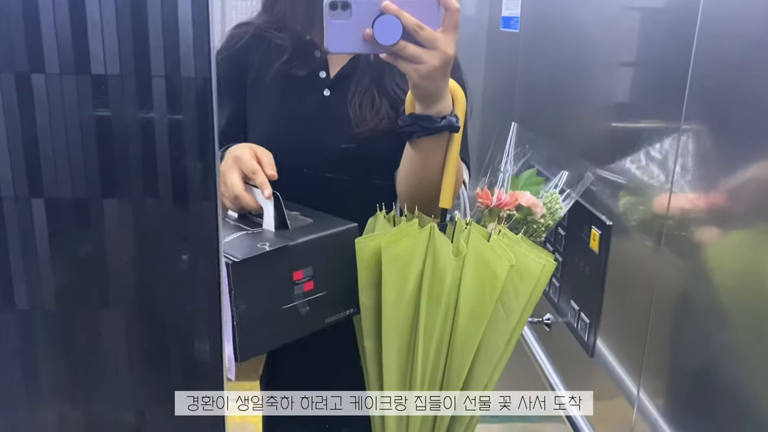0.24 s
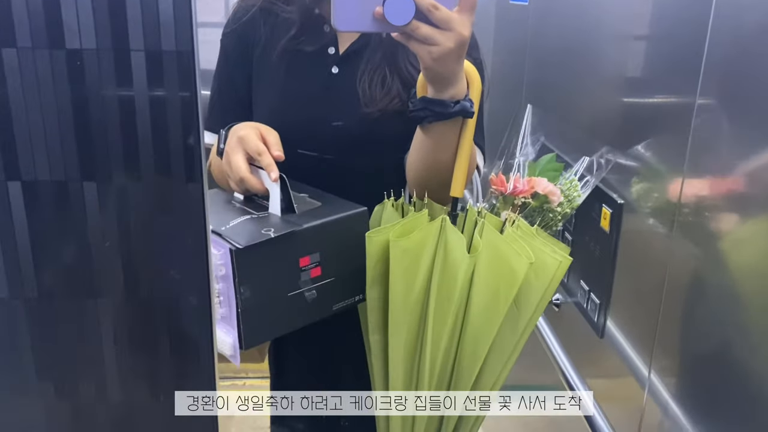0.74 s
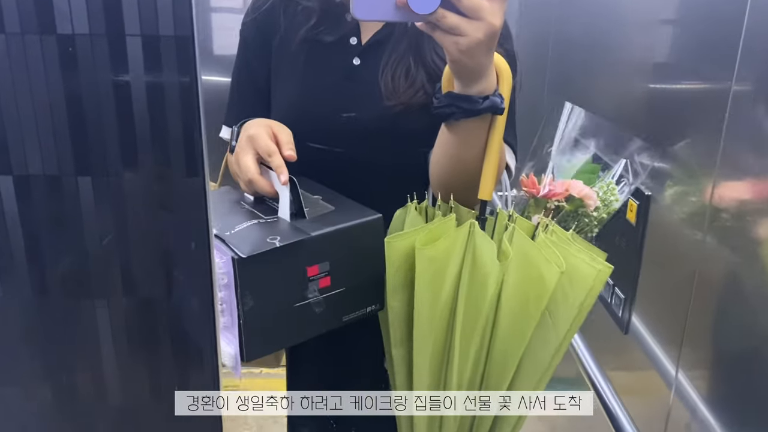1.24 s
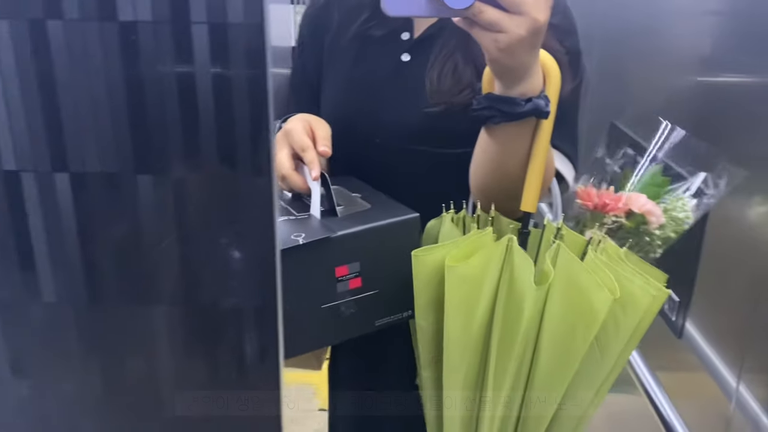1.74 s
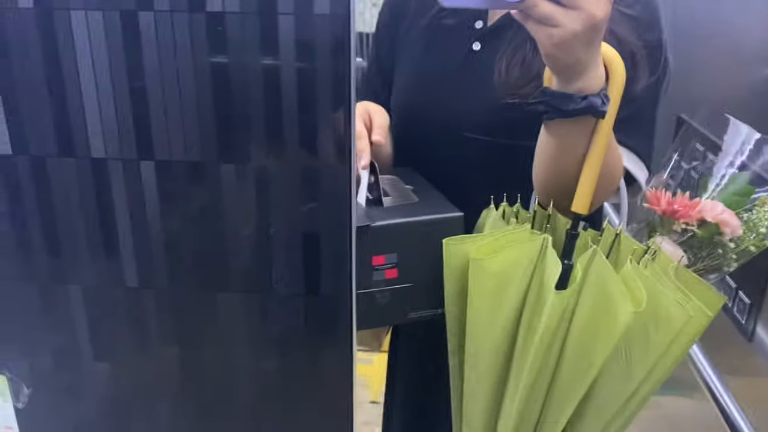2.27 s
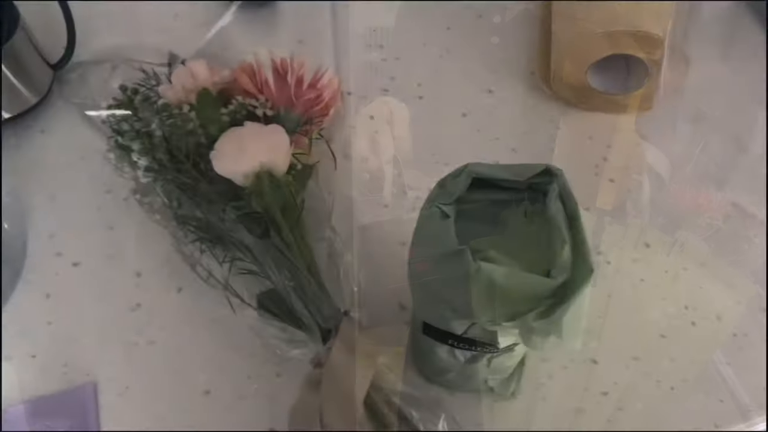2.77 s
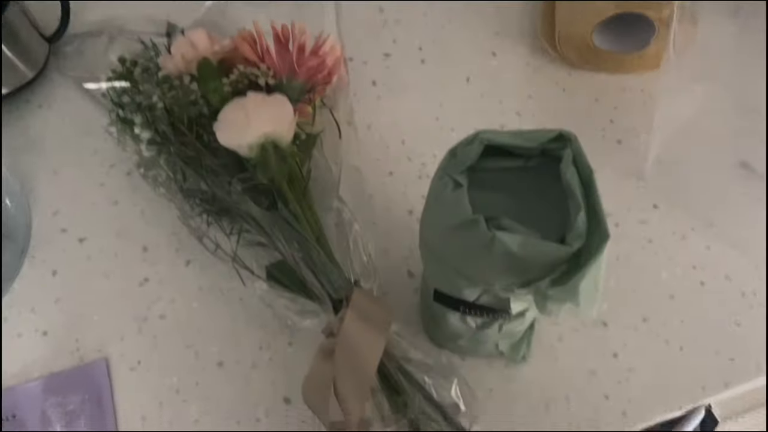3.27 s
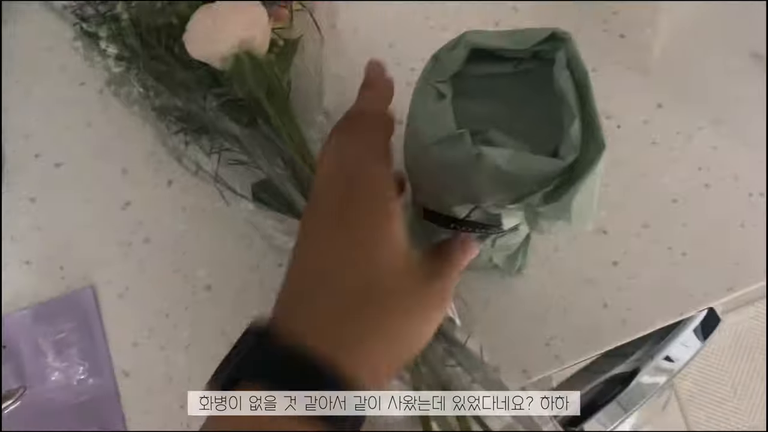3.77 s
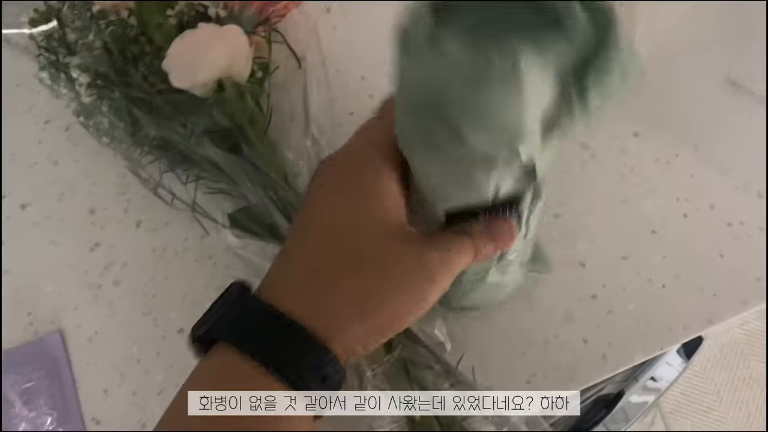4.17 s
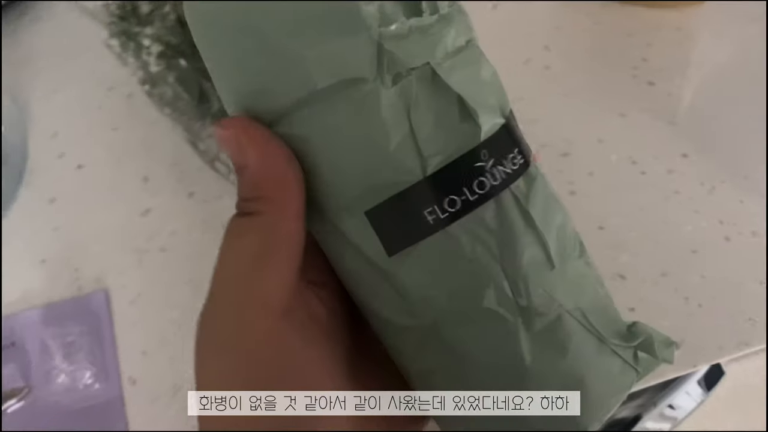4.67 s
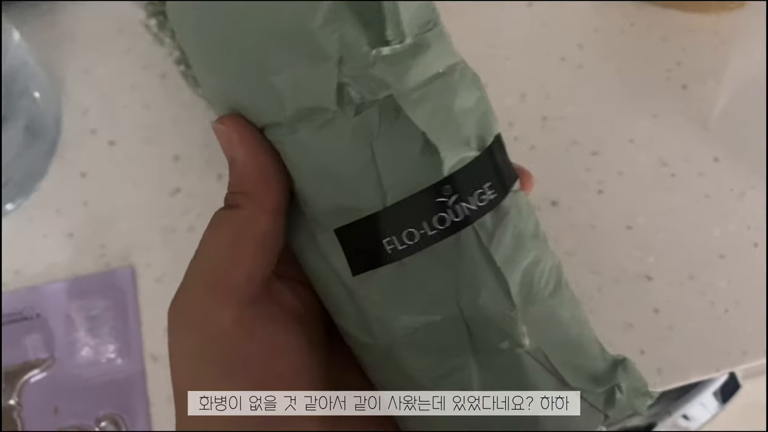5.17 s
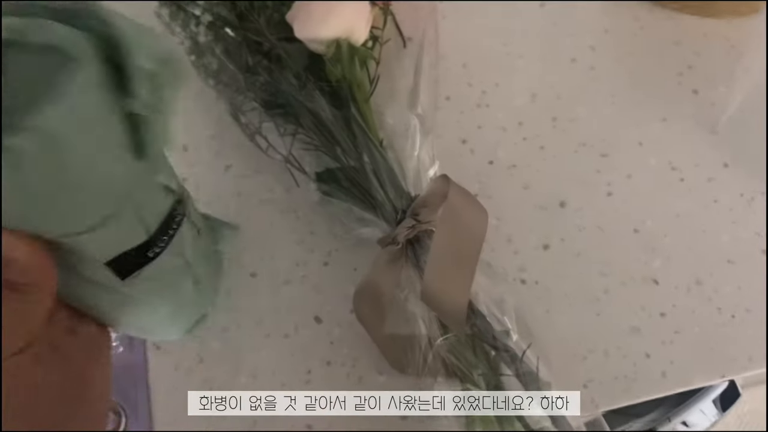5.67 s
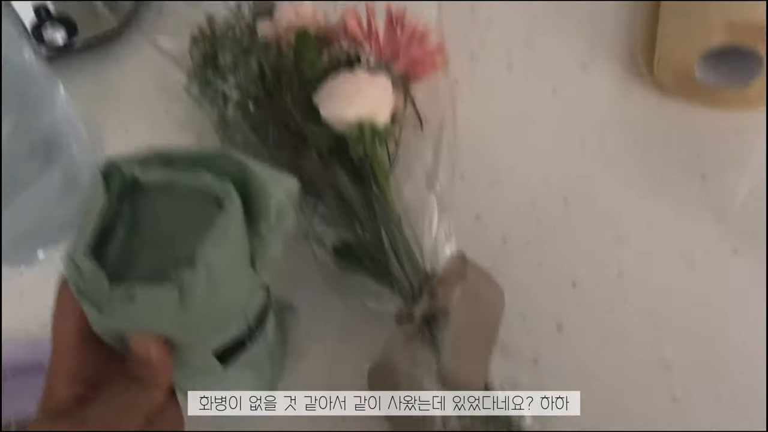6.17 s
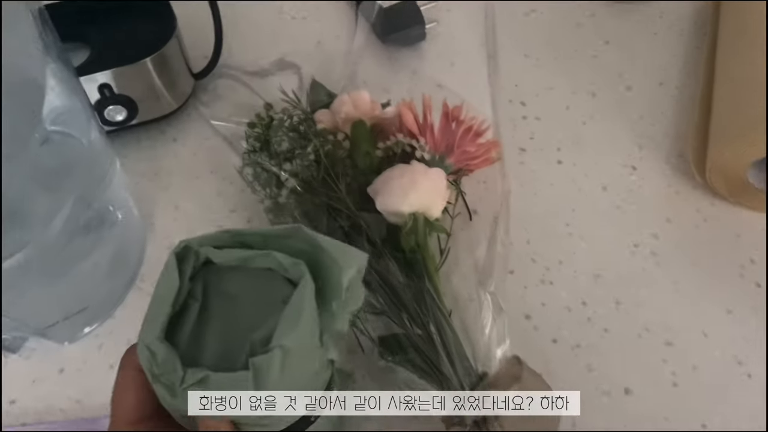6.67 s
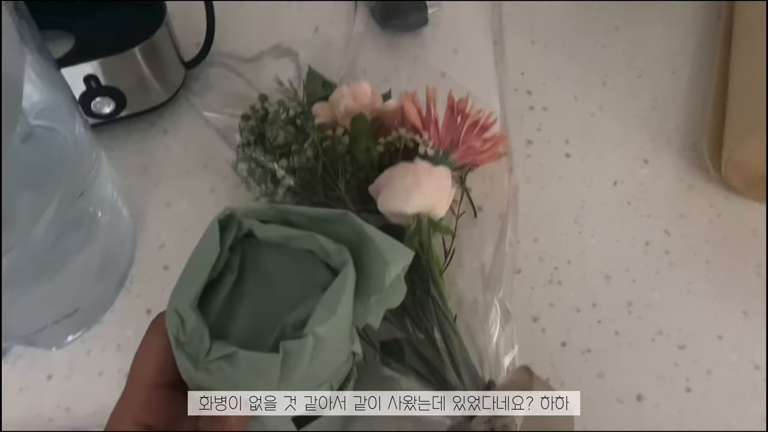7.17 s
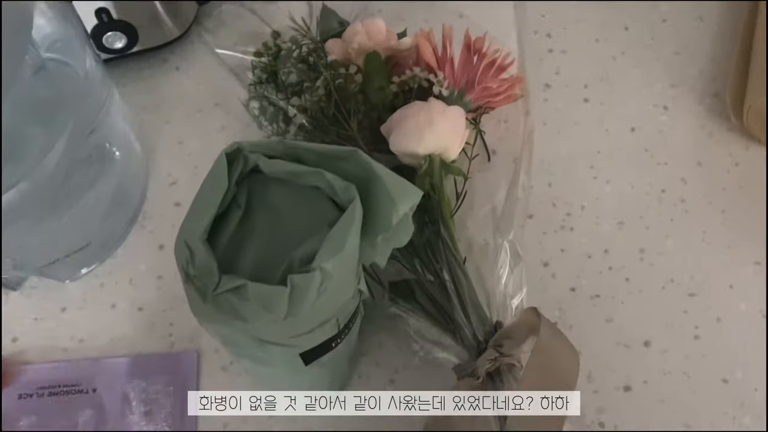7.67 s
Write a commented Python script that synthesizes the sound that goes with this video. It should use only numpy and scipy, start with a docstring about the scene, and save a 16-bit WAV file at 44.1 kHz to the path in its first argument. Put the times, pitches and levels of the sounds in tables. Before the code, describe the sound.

An elevator car rumbles steadily, with faint fan hiss and a thin motor whine, while a bouquet's plastic wrapping rustles lightly. The ride cuts abruptly to a quiet kitchen with a faint fridge hum. A hand grabs a paper-wrapped vase with sharp crackles and a dull thud, turns it with more crinkling, then sets it on the counter, where it rocks with soft knocks. A phone microphone hears it all close by.

```python
"""You hear a moving lift boom, hiss and whine while a bouquet's wrapping rustles, then a quiet kitchen.
The lift's motor shakes the cabin, a fan adds hiss, and the wrapping film brushes against a sleeve.
In the kitchen a fridge hums as a hand picks up a paper-wrapped vase and turns it, snapping creases
in the stiff paper. Set down on the stone counter, the vase rocks, and each knock makes it ring.
Everything is heard through a phone's two microphones."""
import sys
import numpy as np
from scipy import signal
from scipy.fft import rfft, irfft, next_fast_len
from scipy.io import wavfile
from scipy.ndimage import uniform_filter1d

SR = 44100
rng = np.random.default_rng(int(sys.argv[2]) if len(sys.argv) > 2 else 0)


def write(x):
    x = np.atleast_2d(x).T
    wavfile.write(sys.argv[1], SR, np.round(np.clip(x, -1, 1) * 32767).astype(np.int16))


N = 348831
T = np.arange(N) / SR
FFT_SIZE = next_fast_len(N + 4096)
FREQS = np.maximum(np.arange(FFT_SIZE // 2 + 1) * SR / FFT_SIZE, 1)
KITCHEN_START_S = 2.857

# Paper creases that snap. Each row: start in seconds, level in dB, dB added to the low part,
# dB added to the high part, ringing pitch in Hz.
SNAPS = [(3.4135, -67, 4, -12, 1540), (3.4255, -58.5, 2.5, -1, 1940), (3.728, -66, -11.5, 14, 4720),
         (3.7776, -25.5, -16, 2, 5200), (3.7946, -26.5, -2, 2, 4670), (3.7966, -28, 1, 1, 2240),
         (3.797, -29, -7.5, 0, 2520), (3.8009, -30.5, 1.5, 1, 5070), (3.8588, -43, -4, -1, 2100),
         (3.95, -59, -24, -19, 5120), (3.9677, -40.5, -7, 5.5, 2100), (4.0781, -39.5, -8, 1, 2330),
         (4.111, -48, -18.5, 5, 5200), (4.2007, -29, -3.5, 4.5, 4840), (4.2004, -30.5, -22.5, -6, 1510),
         (4.2201, -42.5, 5, -21, 1380), (4.2686, -56, -7, -8, 1790), (4.337, -44, -6, -17, 2300),
         (4.3885, -38, -22, -21, 5130), (4.415, -39.5, -6, -20, 2350), (4.4972, -40.5, -29, 4, 2180),
         (4.528, -39, -16, -8, 4860), (4.575, -33, -6.5, -6.5, 2240), (4.6447, -40.5, -3, -2, 2240),
         (4.675, -41, -5, -17, 2310), (4.7036, -43.5, -1, -5, 2100), (4.7362, -49, -4, -3, 4940),
         (4.762, -45.5, -8, 5.5, 2390), (4.784, -43, -22, -11, 5070), (4.805, -37, -17, -4, 5470),
         (4.8447, -42.5, -26, 2, 1970), (4.916, -49.5, -14, -3, 2300), (4.9552, -50, -13, -22, 2300),
         (4.976, -45.5, -14, -5, 1940), (4.986, -42, -9, -8, 2010), (5.0012, -42.5, -29, 3, 4830),
         (5.025, -49, -29, -1, 4980), (5.047, -45.5, -25, -2, 5190), (5.0604, -49, -31, -2, 4460),
         (5.0674, -49, -31, -8, 4910), (5.133, -50.5, -24, 8, 2290), (5.1427, -49, -29, 10, 4580),
         (5.1866, -47, -24, -17, 2340), (5.2055, -47, -22, 2.5, 4700), (5.2254, -55, -20, -14, 2300),
         (5.253, -47, -22, -6, 2160), (5.2718, -38.5, -24, -1, 2550), (5.294, -40.5, -14, -24, 2370),
         (5.299, -39, -12, -17, 2320), (5.308, -43, -23, -18, 2400), (5.3912, -45, -29, -20, 5100),
         (5.452, -48, -20, -15, 5070), (5.475, -44, -24, -15, 2090), (5.526, -53, -18, 6, 4840),
         (5.577, -49, -16, -5, 4900), (5.622, -52.5, -24, 5, 3320), (5.7095, -49, -20, -5, 4760),
         (5.764, -52.5, -22, 0, 1880), (5.902, -46, -25, -3, 4600), (5.9664, -50, -19, -5, 4740),
         (6.013, -48.5, -22, 1, 5300), (6.0646, -37.5, -16, -12, 5140), (6.08, -43, -17, -20, 5160),
         (6.1679, -46, -2.5, -22, 1610), (6.196, -52, 3, -15, 4860), (6.2884, -53, -25, 0, 5260),
         (6.336, -51, -24, 4, 4620), (6.418, -56, -26, -12, 4720), (6.5063, -57, -15, 3, 2270),
         (6.5342, -57, -11, 3, 2100), (6.6743, -48.5, -27, -24, 4700), (7.0389, -52, -4, -6, 4470),
         (7.062, -58.5, -4, -1, 5310), (7.095, -53, -23, -6, 3100), (7.104, -52.5, -18, -4, 5470),
         (7.2028, -53.5, -10, 4, 3630), (7.2326, -59, -2, 14, 5540), (7.3274, -47, -15, -24, 5240),
         (7.428, -58.5, -23, -23, 4900), (7.5216, -61.5, -6.5, -17, 3230), (7.539, -65.5, -26, 5, 4940),
         (7.637, -58, -27, -1.5, 5820), (7.892, -52.5, -38, -40.5, 5370)]


def undb(db):
    """Turn decibels into a gain; undb(2 * db) gives power."""
    return 10 ** (np.asarray(db) / 20)


def unit(x):
    """Scale a signal to an average power of 1."""
    return x / np.sqrt(np.mean(x ** 2))


def over_time(rows, column=1):
    """Join a table's points with straight lines in time."""
    rows = np.array(rows)
    return np.interp(T, rows[:, 0], rows[:, column])


def over_hz(rows):
    """Join a table's points across frequency, giving each octave equal room."""
    rows = np.array(rows)
    return np.interp(np.log(FREQS), np.log(rows[:, 0]), rows[:, 1])


def filtered(x, gain):
    """Give each frequency its own gain."""
    return irfft(rfft(x, FFT_SIZE) * gain, FFT_SIZE)[..., :N]


def wander(rate):
    """Glide to a new random value `rate` times a second; typical size 1."""
    hold = int(SR / rate)
    steps = np.repeat(rng.standard_normal(N // hold + 1), hold)
    return unit(uniform_filter1d(steps, hold // 2)[:N])


def clicks(rate, spread_db):
    """Powers of about `rate` random clicks a second, many small and few large."""
    hit = rng.random(N) < rate / SR
    power = hit * undb(2 * spread_db * np.minimum(rng.exponential(size=N), 3))
    return power / power.mean()


def bursts(power, snap_s, echo_s, echo_db, rise_s):
    """Turn clicks into noise bursts with a room echo; return two channels and one burst's energy."""
    t = T[:SR // 4]
    echo = undb(2 * echo_db) * np.exp(-2 * np.log(1000) * t / echo_s)
    burst = (1 - np.exp(-(t / rise_s) ** 2)) * (np.exp(-t / snap_s) + echo)
    noise_power = np.abs(signal.fftconvolve(power, burst)[:N])
    return np.sqrt(noise_power) * rng.standard_normal((2, N)), burst.sum()


def swells(base_db, starts, peaks_db, hold_s, rise_db_s, fall_db_s):
    """A level in dB: a base plus events that rise, hold and fall at set dB per second."""
    power = undb(2 * base_db)
    for start, peak_db, hold in np.broadcast(starts, peaks_db, hold_s):
        near = slice(max(int(start * SR) - SR // 4, 0), int(start * SR) + SR // 2)
        t = T[near] - start
        db = peak_db - rise_db_s * np.maximum(-t, 0) - fall_db_s * np.maximum(t - hold, 0)
        power[near] += undb(2 * db)
    return 10 * np.log10(power)


def microphones(pair, likeness, right_lead_s, in_step_hz, above_hz):
    """Left hears the first signal; right blends it, its treble shifted in time, with the second."""
    left, other = pair
    share = np.clip(over_hz(likeness), 0, 1)
    shift = np.where(FREQS > above_hz, np.exp(2j * np.pi * right_lead_s * (FREQS - in_step_hz)), 1)
    right = filtered(left, share * shift) + filtered(other, np.sqrt(1 - share ** 2))
    return np.array([left, right])


def kitchen_air():
    """Dull room noise with one ringing band, coming up in two steps."""
    # The room's tone. Each row: frequency in Hz, relative level in dB.
    tone = [(20, -35), (40, -9), (62, 1.5), (95, -9), (135, -22), (200, -14.5), (270, -19.5), (400, -23.5),
            (445, -17), (490, -27), (560, -28.5), (700, -41), (1000, -42), (2000, -46.5), (3000, -51),
            (7500, -53.5), (14000, -62.5)]
    # Its loudness. Each row: time in seconds, level in dB.
    levels = [(2.86, -68.5), (3.7, -65.5), (3.85, -61), (7.91, -63.5)]
    return unit(filtered(rng.standard_normal((2, N)), undb(over_hz(tone)))) * undb(over_time(levels))


def fridge():
    """Mains electricity makes the fridge hum; the level wavers slightly."""
    # The hum. Each row: time in seconds, level in dB.
    levels = [(2.86, -73), (3.7, -77), (3.9, -69), (6.5, -67.5), (7.3, -67), (7.91, -67.5)]
    hum_hz, waver_db = 120.3, 1.4
    db = over_time(levels) + waver_db * wander(rate=9)
    return undb(db) * np.sqrt(2) * np.sin(2 * np.pi * hum_hz * T)


def cabin_rumble():
    """Deep rumble and faint fan hiss, stronger where the motor makes the cabin and its panels ring."""
    # The noise's tone. Each row: frequency in Hz, relative level in dB.
    tone = [(22, -4), (45, -7.5), (80, 1), (150, -2), (220, -8.5), (320, -11), (600, -15), (1000, -19.5),
            (1500, -27), (2600, -31), (4000, -49.5), (7000, -44), (11000, -47), (15000, -46)]
    # Where the cabin rings. Each row: pitch in Hz, width in Hz, boost in dB.
    resonances = [(52, 4, 6.5), (77.3, 7, 4.5), (101.2, 12, 8), (149.4, 11, 3), (178.5, 4.9, 6),
                  (228.7, 5.7, 9), (253.7, 6.2, 11.5), (272.7, 6.7, 4), (382, 16.4, 6.5), (391, 11, 5),
                  (449, 21, 3), (520, 47, 4), (599, 8.1, 6), (828.3, 7.7, 6), (986, 45, 3.5)]
    # The ride's loudness. Each row: time in seconds, level in dB.
    levels = [(0.0, -35.5), (1.0, -35), (1.9, -35.5), (2.15, -36), (2.4, -35.5), (2.85, -36.5)]
    boost = 1 + sum(undb(2 * db) / (1 + (2 * (FREQS - hz) / width) ** 4) for hz, width, db in resonances)
    rumble = filtered(rng.standard_normal((2, N)), undb(over_hz(tone)) * np.sqrt(boost))
    return unit(rumble) * undb(over_time(levels))


def motor_whine():
    """Thin motor tones that waver in pitch and level, loudest overall at full speed."""
    # The tones. Each row: pitch in Hz, then level in dB at the start, at full speed and when slowing.
    whines = [(104.5, -45, -43, -47), (501, -57, -57, -63), (2704, -75, -69, -80), (3974, -82, -82, -82),
              (7955, -84, -84, -84), (11935, -87, -87, -87), (15005, -77, -79, -76)]
    ride_s = (.3, .9, 1.5, 2.0)  # speeds up between the first two, slows between the last two
    waver_hz, waver_db = 2.16, 1.85
    out = 0
    for hz, start_db, full_db, slow_db in whines:
        db = np.interp(T, ride_s, (start_db, full_db, full_db, slow_db)) + waver_db * wander(rate=5.98)
        pitch = hz + waver_hz * wander(rate=7.89)
        out = out + undb(db) * np.sqrt(2) * np.sin(2 * np.pi * np.cumsum(pitch) / SR)
    return out


def bouquet():
    """Wrapping film brushes a sleeve, making tiny clicks that blur into a rustle."""
    # The film's tone. Each row: frequency in Hz, relative level in dB.
    tone = [(600, 3), (1500, 4.5), (2600, 5), (5000, 2), (8000, -3), (15000, -11.5)]
    # Steady brushing. Each row: time in seconds, level in dB.
    steady = [(0.0, -59), (0.9, -58), (1.2, -53.5), (1.5, -54), (1.8, -58), (2.33, -60), (2.85, -56)]
    # Sudden brushes. Each row: time in seconds, peak level in dB.
    brushes = [(0.046, -50.5), (0.23, -53), (0.575, -53), (1.06, -58), (1.11, -57), (1.178, -54),
               (1.248, -48.5), (1.429, -53.5), (1.545, -53)]
    rustle, _ = bursts(clicks(rate=900, spread_db=1.0), snap_s=.002, echo_s=0.3, echo_db=-12, rise_s=.0002)
    db = swells(over_time(steady), *np.transpose(brushes), hold_s=0, rise_db_s=1999, fall_db_s=128)
    return unit(filtered(rustle, undb(over_hz(tone)))) * undb(db)


def paper_crackle():
    """Stiff paper creases under the hand: a fine rustle and single snaps, in low, middle and high parts."""
    # The paper's tone. Each row: frequency in Hz, relative level in dB.
    tone = [(150, -22), (300, -11), (600, -7.5), (1000, -8.5), (1600, -3.5), (1950, -1), (2250, 2),
            (2600, -1), (3100, -3.5), (4000, -4), (5100, 0), (6000, -2.5), (7500, -4.5), (10000, -11),
            (14000, -14), (16000, -17)]
    # Steady rustle under the hand. Each row: time in seconds, level in dB, dB added to the low part.
    grip = [(3.7, -107, -8), (3.74, -61, -6), (3.9, -64.5, -1.5), (4.2, -63, -7), (4.3, -56.5, -5.5),
            (4.65, -55.5, -8.5), (4.74, -65.5, -4), (4.94, -76, -8), (5.18, -70, -4.5), (5.35, -60.5, -6.5),
            (5.5, -62.5, -5), (5.65, -67, -13), (5.88, -75.5, -6.5), (6.15, -67, -9.5), (6.6, -68.5, -11),
            (6.75, -72.5, -13), (6.93, -85, -4), (7.0, -81, -7), (7.35, -71, -9.5), (7.5, -97.5, 8),
            (7.6, -102, 4)]
    # Fingers squeeze the paper. Each row: time in seconds, peak level in dB, hold in seconds.
    squeezes = [(3.774, -54.5, .01), (3.793, -40.5, 0.0072), (3.847, -53, 0.032), (3.997, -57.5, 0.0085),
                (4.117, -56.5, 0.015), (4.2, -69, 0.011), (4.782, -63.5, 0.081), (4.994, -61, 0.0045),
                (5.07, -67.5, .01), (5.133, -69, 0.0086), (5.212, -63.5, .005), (5.29, -59.5, 0.017),
                (5.44, -59.5, 0.027), (5.554, -59.5, 0.0068), (5.69, -69, 0.011), (5.78, -75, 0.0089),
                (5.847, -74, 0.004), (5.919, -66, 0.0035), (6.058, -60, 0.015), (6.198, -62.5, 0.019),
                (6.302, -61, 0.044), (6.513, -65, 0.065), (6.81, -71, 0.089), (6.979, -69.5, .005),
                (7.192, -65, 0.062), (7.3, -68.5, 0.048)]
    low_hz, high_hz = 1855, 7840
    grip_high_db, flicker_db, crack_db = -4, 0.7, -2
    low = 1 / (1 + (FREQS / low_hz) ** 6)
    high = 1 / (1 + (high_hz / FREQS) ** 6)
    starts, snap_db, low_db, high_db, _ = np.transpose(SNAPS)
    parts = [(low, over_time(grip, column=2), low_db), (1 - low - high, 0, 0), (high, grip_high_db, high_db)]
    held = (T > grip[0][0]) & (T < grip[-1][0])
    hand_db = swells(over_time(grip), *np.transpose(squeezes), rise_db_s=397.5, fall_db_s=256)
    shared_creases = clicks(rate=160, spread_db=2.0)  # these sound in all three parts
    out = 0
    for band, rustle_extra_db, snap_extra_db in parts:
        creases = (shared_creases + clicks(rate=1100, spread_db=1.5)) / 2 * held
        creases *= undb(2 * (hand_db + rustle_extra_db + flicker_db * wander(rate=22)))
        rustle, energy = bursts(creases, snap_s=0.0012, echo_s=0.066, echo_db=-9.5, rise_s=0.00019)
        cracks = np.zeros(N)  # the sharp first instant of each snap
        cracks[(starts * SR).astype(int)] = undb(snap_db + snap_extra_db)
        snaps, _ = bursts(cracks ** 2, snap_s=0.00036, echo_s=0.08, echo_db=-16.5, rise_s=0.00025)
        crackle = rustle / np.sqrt(energy) + snaps + undb(crack_db) * cracks
        out = out + filtered(crackle, unit(band * undb(over_hz(tone))))
    return out


def paper_pops(ring_db, cycles):
    """Each snap frees a small patch of paper, which rings briefly at its own pitch."""
    out, t = np.zeros(N + SR), T[:SR // 50]
    for start, db, _, _, hz in SNAPS:
        ring = np.exp(-t * hz / cycles) * np.sin(2 * np.pi * hz * t)
        out[int(start * SR):][:len(t)] += undb(db + ring_db) * ring
    return out[:N]


def vase_knocks():
    """Paper softens the start of each knock, then the vase rings; a tight grip shortens both."""
    # Dull thuds as the hand grabs and turns the vase, then rocking on the counter. Each row: start in
    # seconds, level in dB, pitch in Hz (set by the spot hit), time stretch (smaller for a tighter grip).
    knocks = [(3.427, -56, 620, 0.4), (3.428, -62, 320, 0.5), (3.8, -43, 500, 0.8),
              (3.795, -28.5, 666, 0.16), (3.780, -46, 258, 0.4), (3.797, -46, 245, 1.3),
              (3.799, -46.5, 824, 0.8), (3.84, -51, 245, 0.8), (4.202, -51, 650, 0),
              (4.322, -57.5, 490, 0.6), (4.435, -64, 536, 0.7), (4.528, -57, 520, 1), (4.575, -74, 490, .8),
              (4.629, -59, 453, .8), (4.678, -61.5, 525, 0.9), (4.737, -57, 479, 0.36),
              (4.99, -70, 520, .8), (5.476, -61.5, 520, 1), (6.169, -45, 350, 0.6),
              (6.170, -48.5, 500, 0.64), (6.209, -47, 444, 0.96), (6.234, -45, 435, 0.8),
              (6.254, -54, 462, 1), (6.278, -53, 436, 0.9), (6.361, -60, 454, 0.85), (6.451, -63, 442, .95),
              (6.577, -56, 438, 1), (6.602, -62, 435, .86), (6.633, -67, 445, .95), (6.683, -64, 438, .98)]
    # The vase's tones. Each row: multiple of the knock's pitch, relative level in dB,
    # seconds to fade by 60 dB before stretching.
    tones = [(1, 10, 0.047), (.75, -5, 0.018), (.4, -12.5, 0.15), (1.6, -8, 0.022), (3, -15, 0.07),
             (3.65, -12, 0.057)]
    rise_s = 0.0038
    out, t = np.zeros(N + SR), T[:SR // 4]
    for start, db, hz, stretch in knocks:
        age = t / np.clip(stretch, .15, 1.5)
        rise = 1 - np.exp(-(age / rise_s) ** 2)
        ring = sum(undb(tone_db) * np.exp(-np.log(1000) * age / fade_s) * np.sin(2 * np.pi * ratio * hz * t)
                   for ratio, tone_db, fade_s in tones)
        out[int(start * SR):][:len(t)] += undb(db) * rise * ring
    return out[:N] * undb([[2.5], [-3]])  # nearer the left microphone


def scene():
    """The lift scene ends abruptly and the kitchen scene follows."""
    # How alike the two microphones sound in each place. Each row: frequency in Hz, likeness from 0 to 1.
    lift_likeness = [(60, 1), (130, 0.97), (290, 0.71), (640, 0.1), (1400, 0.09), (3000, 0.4), (5500, 0.25),
                     (6800, 1), (16000, 1)]
    kitchen_likeness = [(60, 0.99), (130, 1), (290, 0.78), (640, 0.028), (1600, 0.67), (2800, 0.014),
                        (3700, .05), (5500, 0.75), (6800, 1), (16000, 0.9)]
    kitchen = (kitchen_air() + fridge()) * (T > KITCHEN_START_S)
    kitchen += paper_crackle() + paper_pops(ring_db=-10.5, cycles=5.5)
    kitchen = microphones(kitchen, kitchen_likeness, right_lead_s=-.000164, in_step_hz=10400, above_hz=4700)
    lift = cabin_rumble() + bouquet() + motor_whine()
    lift = microphones(lift, lift_likeness, right_lead_s=.000238, in_step_hz=6800, above_hz=6800)
    lift_fade = np.clip((KITCHEN_START_S - T) / 0.0029, 0, 1)
    return lift * lift_fade + kitchen + vase_knocks()


def record(dry):
    """The deepest bass and the highest treble are filtered away."""
    bottom_hz, top_hz = 24, 15750
    x = signal.sosfilt(signal.butter(4, bottom_hz, "high", fs=SR, output="sos"), dry)
    return signal.sosfilt(signal.ellip(10, .2, 70, top_hz, fs=SR, output="sos"), x)


dry = scene()
out = record(dry)
write(out)
```